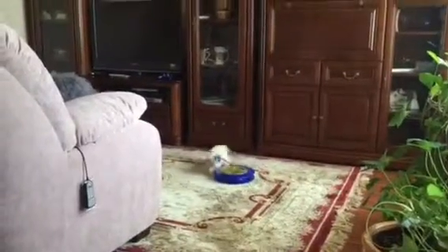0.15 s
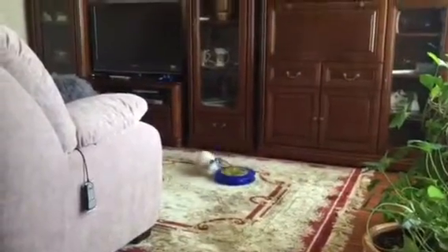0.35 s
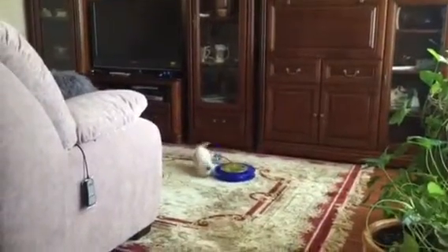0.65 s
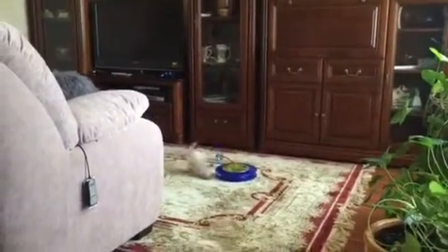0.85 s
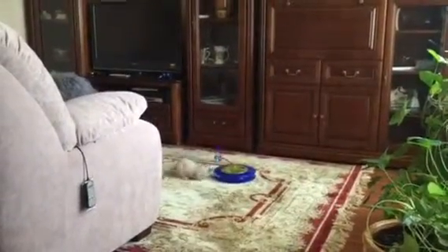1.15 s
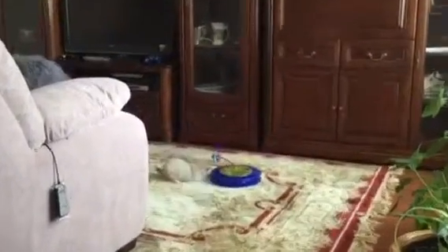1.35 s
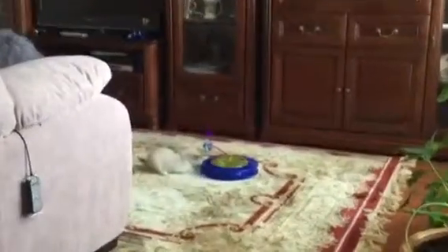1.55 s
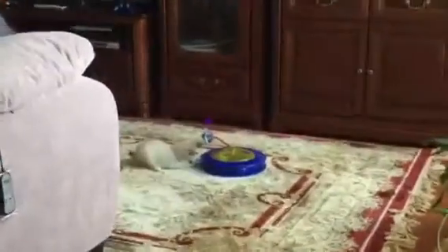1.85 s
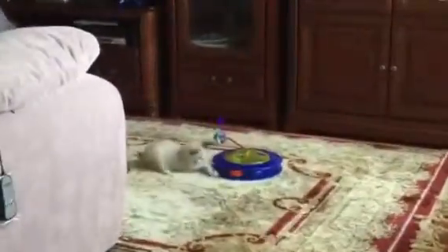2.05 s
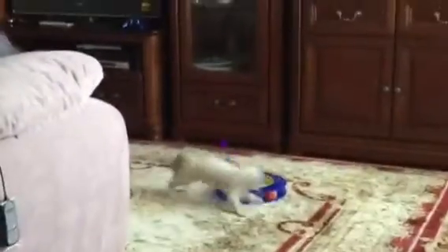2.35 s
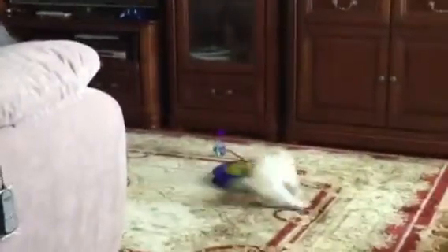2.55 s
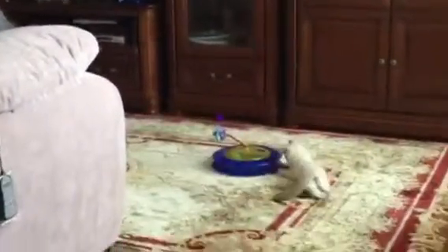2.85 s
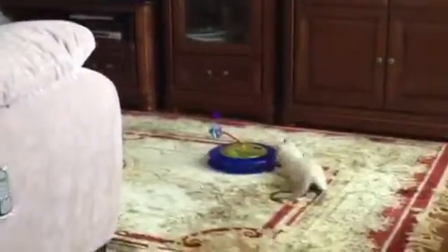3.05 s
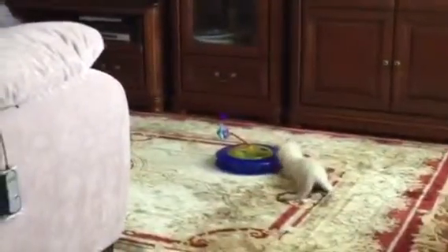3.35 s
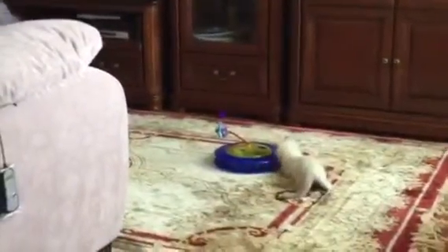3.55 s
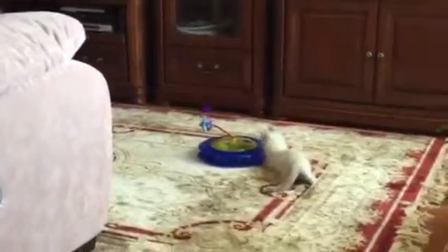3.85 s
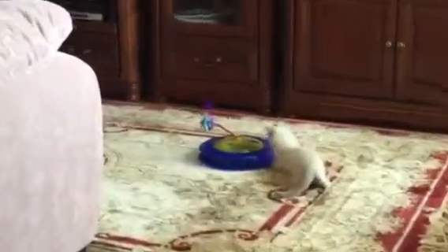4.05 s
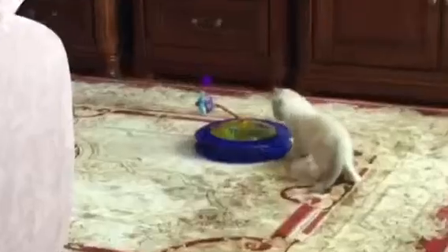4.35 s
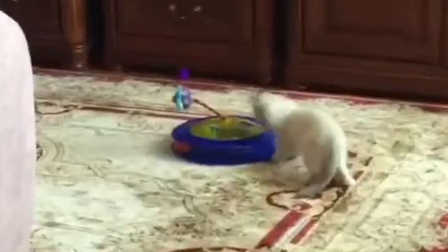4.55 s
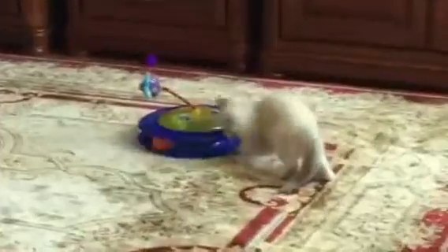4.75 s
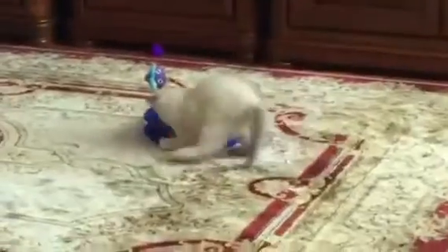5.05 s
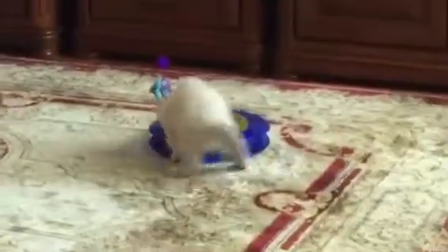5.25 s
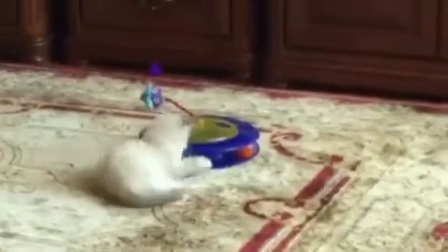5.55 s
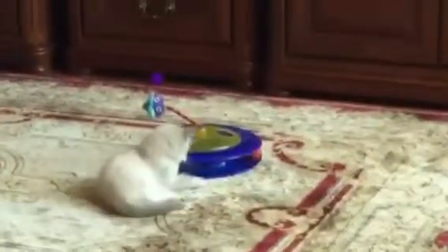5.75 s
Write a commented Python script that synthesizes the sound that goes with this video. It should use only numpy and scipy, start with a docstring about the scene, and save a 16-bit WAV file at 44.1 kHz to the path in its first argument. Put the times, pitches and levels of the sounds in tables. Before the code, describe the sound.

A kitten plays with a round plastic ball track on a living room rug. A sharp, hollow clack comes right at the start, followed by scattered lighter knocks and small ticks. The ball rattles faintly as it rolls in short runs, and paws thump softly on the floor. Quick clusters of clacks come midway and near the end. A small microphone a few metres away picks up a brief room ring, faint air noise and hum.

```python
"""A furnished living room, one small microphone a few metres from a kitten playing on the rug.
Its toy is a round plastic ball track: the ball knocks against the hollow walls and rumbles as it rolls,
loose plastic parts tick, and paws thump the floor. The room rings briefly after each knock and tick,
over faint air noise and a hum in the house."""
import sys
import numpy as np
from scipy import signal
from scipy.fft import rfft, irfft, next_fast_len
from scipy.io import wavfile

SR = 44100
rng = np.random.default_rng(int(sys.argv[2]) if len(sys.argv) > 2 else 0)


def persist_wave(psi):
    """Save psi, clipped to +-1, as 16-bit WAV."""
    counts = np.round(np.clip(psi, -1, 1) * 32767).astype(np.int16)
    wavfile.write(sys.argv[1], SR, np.atleast_2d(counts).T)


N = 259749
T = np.arange(int(.45 * SR)) / SR  # time axis of one blow, s

# modes of the hollow track: pitch_hz, relative_db, t60_s
TRACK_MODES = [(691, 9.5, 0.052), (827, 1, .22), (874, 4.5, 0.3), (939, 3.5, 0.26), (966, 1.5, 0.35),
               (1017, -6.5, 0.43), (1048, 2.5, 0.36), (1287, -8.5, 0.38), (1398, -3, 0.26),
               (1509, -1.5, .32), (1610, -10.5, 0.24), (1900, -24.5, 0.17), (2040, -29.5, 0.11),
               (2060, -1, 0.089), (2440, -14, 0.45), (2580, -13.5, 0.12), (2900, -24.5, 0.25),
               (3126, -7, 0.094), (2995, -12, 0.12), (3510, -9.5, 0.25), (3700, -16, 0.27),
               (3950, -26.5, 0.15), (4360, -14.5, 0.22), (6140, -35, 0.68)]
# spectrum of the crack of a contact with the track: frequency_hz, relative_db
CRACK_SPECTRUM = [(150, -25.5), (360, 0.5), (500, -12.5), (800, 6.5), (1600, -0.5), (2250, -3),
                  (3150, -0.5), (4800, -10.5), (6200, -6), (7500, -13.5), (9500, -6.5), (11000, -37.5)]


def undb(db):
    """Decibels to gain."""
    return 10 ** (np.asarray(db) / 20)


def unit(x):
    """Scale to unit energy."""
    return x / np.sqrt(np.sum(x ** 2))


def fade(t60):
    """Exponential decay, 60 dB down after t60 seconds."""
    return np.exp(-np.log(1000) * T / t60)


def colour(x, points):
    """Minimum-phase filter through the points (frequency_hz, gain_db)."""
    size = 2 * next_fast_len(len(x))
    hz, db = np.transpose(points)
    log_hz = np.log(np.fft.rfftfreq(size, 1 / SR) + 1)
    cepstrum = irfft(np.log(undb(np.interp(log_hz, np.log(hz), db))))
    cepstrum[1:size // 2] *= 2
    cepstrum[size // 2 + 1:] = 0
    return irfft(rfft(x, size) * np.exp(rfft(cepstrum)))[:len(x)]


def butter(x, hz, kind, order=2):
    """Plain low-, high- or band-pass."""
    return signal.sosfilt(signal.butter(order, np.minimum(hz, SR / 2 - 1), kind, fs=SR, output="sos"), x)


def place(out, start_s, level_db, sound):
    """Mix in a blow; level_db is the RMS level of its first 25 ms."""
    start = int(start_s * SR)
    gain = undb(level_db) / np.sqrt(np.mean(sound[:SR // 40] ** 2))
    out[start:start + len(T)] += gain * sound[:N - start]


def room_tone(air_db=-64, waver_hz=1.604):
    """Faint air noise and a slightly wavering hum."""
    # air in the still room: frequency_hz, relative_db
    air_spectrum = [(25, -36), (45, -14.5), (70, -7.5), (110, -1), (180, -5), (230, -5), (380, -11),
                    (600, -15.5), (1000, -20), (2000, -25), (4000, -28.5), (10500, -35.5)]
    # hum in the house: pitch_hz, level_db
    hum_tones = [(49.5, -74), (97.5, -72.5), (123.5, -71.5), (215.5, -73.5)]
    air = colour(rng.standard_normal(N), air_spectrum)
    out = air / np.std(air) * undb(air_db)
    for pitch_hz, level_db in hum_tones:
        drift = butter(rng.standard_normal(N), 5.1, "lowpass")
        wavering_hz = pitch_hz + waver_hz * drift / np.std(drift)
        out += np.sqrt(2) * undb(level_db) * np.sin(2 * np.pi * np.cumsum(wavering_hz) / SR)
    return out


def in_room(sound, wet_db, build_s=0.0029, cabinet_s=.0083, cabinet_db=-7):
    """Direct sound, a reflection off the cabinets and a fresh diffuse tail whose treble dies first."""
    # reverberation time of the room: frequency_hz, t60_s
    decay_times = [(150, 0.74), (500, 0.33), (1000, 0.28), (2000, 0.32), (4000, 0.28), (10000, 0.23)]
    centres_hz, t60s = np.transpose(decay_times)
    noise = rfft(rng.standard_normal(len(T)))
    log_hz = np.log(np.fft.rfftfreq(len(T), 1 / SR) + 1)
    bands = (np.interp(log_hz, np.log(centres_hz), row) for row in np.eye(len(centres_hz)))
    tail = sum(irfft(noise * band, len(T)) * fade(t60) for band, t60 in zip(bands, t60s))
    response = undb(wet_db) * unit(tail * (1 - np.exp(-T / build_s)))
    response[0] += 1
    response[int(cabinet_s * SR)] += undb(cabinet_db)
    return signal.fftconvolve(sound, unit(response))[:len(T)]


def ring(modes, detune):
    """Decaying modes; the place of the blow changes their phase and, a little, their strength and pitch."""
    out = 0
    for hz, db, t60 in modes:
        size, shift = rng.standard_normal(2)
        phase = 2 * np.pi * (hz * (1 + detune * shift) * T + rng.random())
        out = out + undb(db + 2 * size) * fade(t60) * np.sin(phase)
    return unit(out * (1 - fade(0.01)))


def click(t60, grit_db):
    """A sharp impulse followed by grit: the dense, quickly dying modes of thin plastic."""
    burst = undb(grit_db) * unit(rng.standard_normal(len(T)) * fade(t60))
    burst[0] += 1
    return burst


def contact(spectrum, t60, grit_db):
    """A click coloured by the plastic part that is struck."""
    return unit(colour(click(t60, grit_db), spectrum))


def rim_clack(t60, band_hz=(1300, 1900)):
    """The stiff rim clacks with a cluster of close, short modes."""
    return unit(butter(click(t60, grit_db=-2), band_hz, "bandpass", order=3))


def paw_thumps(push_s=0.003):
    """Paws push softly on the rug and the floor answers."""
    # soft landings of the kitten: start_s, level_db
    landings = [(0.794, -51), (0.829, -48), (2.844, -43), (2.905, -46), (5.594, -46), (5.689, -52)]
    # modes of the floor under the rug: pitch_hz, relative_db, t60_s
    floor_modes = [(134.6, -6.5, 0.45), (187, 14.5, 0.031), (204.6, 9.5, 0.24), (279, 10.5, 0.13)]
    out = np.zeros(N)
    for start_s, level_db in landings:
        place(out, start_s, level_db, ring(floor_modes, detune=0.019) * (1 - np.exp(-T / push_s)))
    return out


def plastic_ticks():
    """Small stiff parts ring in the treble and pass some of the blow on to the track."""
    # light ticks of loose plastic: start_s, level_db, low_cut_hz, track_share_db
    ticks = [(0.2580, -46, 5770, -13), (1.4707, -57, 5440, -16), (2.043, -67.5, 6950, -22),
             (2.138, -66, 5560, -19), (2.170, -63, 6100, -15), (2.8135, -62.5, 5800, -22),
             (3.34, -58.5, 6500, 0), (3.386, -42, 1470, -15), (4.646, -69.5, 6000, -22)]
    # spectrum of a tick: frequency_hz, relative_db
    tick_spectrum = [(1000, 7), (3000, 4.5), (4500, 0.5), (6500, 3.5), (7800, -2), (9300, 3.5),
                     (11000, -18.5)]
    out = np.zeros(N)
    for start_s, level_db, low_cut_hz, track_share_db in ticks:
        tick = contact(tick_spectrum, t60=0.018, grit_db=-1)
        small_part = in_room(unit(butter(tick, low_cut_hz, "highpass", order=6)), wet_db=1.5)
        track = undb(track_share_db) * ring(TRACK_MODES, detune=.002)
        place(out, start_s, level_db, small_part + track)
    return out


def roll_gain(push_s=.02, friction_db_per_s=14, stop_db_per_s=202.5, wobble_hz=21, wobble_db=1.5):
    """Each run swells with the push, sinks as friction slows the ball and dies away when it stops."""
    # runs of the ball round the track: start_s, length_s, start_level_db
    runs = [(0, 0.2, -65.5), (2.118, 0.099, -55), (2.356, .3, -66), (2.829, 0.079, -42.5),
            (3.517, 0.31, -68), (3.92, 0.38, -74.5), (4.462, 1, -69.5), (5.012, 0.061, -60.5),
            (5.496, .23, -58), (5.855, .05, -63.5)]
    out = np.zeros(N)
    for start_s, length_s, start_level_db in runs:
        age_s = np.maximum(np.arange(N) / SR - start_s, 0)
        loss_db = friction_db_per_s * age_s + stop_db_per_s * np.maximum(age_s - length_s, 0)
        out += np.minimum(age_s / push_s, 1) * undb(start_level_db - loss_db)
    # the ball wobbles in its groove, so the rattle comes in spurts
    wobble = butter(rng.standard_normal(N), wobble_hz, "lowpass")
    return out * undb(wobble_db * wobble / np.std(wobble))


def rolling_ball(spread_db=3, wall_band_hz=(900, 1350), rim_db=-4, track_db=-8, crack_db=-14):
    """The ball trips over ridges at uneven steps; the small bumps rattle in the walls and the rim."""
    gaps_s = rng.uniform(.003, .035, 600)
    sizes = rng.choice([-1, 1], len(gaps_s)) * undb(spread_db * rng.standard_normal(len(gaps_s)))
    bumps = np.bincount((np.cumsum(gaps_s) * SR).astype(int), sizes, minlength=N)[:N]
    walls = unit(butter(signal.unit_impulse(len(T)), wall_band_hz, "bandpass"))
    rim = undb(rim_db) * rim_clack(t60=0.043)
    crack = undb(crack_db) * contact(CRACK_SPECTRUM, t60=0.049, grit_db=3)
    one_bump = in_room(walls + rim + crack, wet_db=4) + undb(track_db) * ring(TRACK_MODES, detune=0.0016)
    rattle = signal.fftconvolve(bumps, one_bump)[:N]
    return rattle / np.std(rattle) * roll_gain()


def track_knocks(wall_t60=0.014, rise_s=0.0016, track_db=-1.5, soft_hz=2200,
                 medium_wall_hz=1020, medium_blow_db=-48):
    """Each blow dents a wall for a few cycles, clacks the rim, cracks, and sets track and base ringing."""
    # ball and paws against the track: start_s, level_db, wall_pitch_hz, crack_db (higher is harder)
    blows = [(0.041, -57, 1100, -18), (0.096, -59.5, 1110, -6), (0.199, -56.5, 1160, -7),
             (0.279, -23, 872, 0.5), (0.671, -61, 686, -28), (0.736, -50.5, 740, -13),
             (0.81, -54.5, 746, -8), (1.5143, -31, 910, -3.5), (1.9119, -40.5, 896, -5),
             (2.139, -46.5, 980, -7.5), (2.154, -46, 1270, -8.5), (2.174, -42.5, 1067, -15),
             (2.226, -50.5, 966, -21), (2.314, -59.5, 1060, -11), (2.358, -52, 1010, -11),
             (2.497, -61, 1510, -8), (2.629, -53, 1146, -13.5), (2.816, -54, 1340, -11),
             (2.8400, -31.5, 632, -3.5), (2.852, -39, 1320, 1), (2.926, -42.5, 1055, -2),
             (3.435, -46.5, 480, -4.5), (3.609, -55.5, 1070, -17), (3.6595, -48, 1150, -17),
             (4.018, -62, 1060, -22), (4.089, -55, 1140, -37), (4.151, -60, 1100, -26),
             (4.6478, -51, 1140, -17), (4.683, -65, 1240, -21), (5.019, -51.5, 990, -23),
             (5.1013, -42.5, 977, -22), (5.32, -54, 924, -14.5), (5.4636, -35.5, 928, -8),
             (5.485, -38, 624, -5.5), (5.508, -38, 520, -12.5), (5.544, -49.5, 1010, 15),
             (5.585, -43.5, 1060, 3), (5.599, -45, 670, -2), (5.623, -42.5, 1100, -11.5),
             (5.700, -57.5, 940, 1.5)]
    # modes of the toy's base: pitch_hz, relative_db, t60_s
    base_modes = [(210.3, -13.5, 0.47), (290.3, -2.5, 0.25), (365.4, -2, 0.22), (431.7, -8.5, 0.2),
                  (547, 1, 0.2), (609, 5, 0.064)]
    out = np.zeros(N)
    for start_s, level_db, wall_pitch_hz, crack_db in blows:
        wall = np.sin(2 * np.pi * wall_pitch_hz * T) * fade(wall_t60) * (1 - np.exp(-T / rise_s))
        # so small a wall radiates little below its own pitch
        wall = unit(butter(wall, 0.54 * wall_pitch_hz, "highpass", order=3))
        # the rim clacks more under a hard contact and near a stiff, high-pitched wall
        rim_db = -5 + 0.38 * crack_db + 5 * np.log2(wall_pitch_hz / medium_wall_hz)
        rim = undb(rim_db) * rim_clack(t60=0.015)
        crack = undb(crack_db) * contact(CRACK_SPECTRUM, t60=0.029, grit_db=9.0)
        # a soft contact misses the high modes
        bright = ring(TRACK_MODES, detune=0.00083)
        dull = butter(bright, soft_hz, "lowpass", order=1)
        hardness = min(undb(crack_db) * 2, 1)
        track = undb(track_db) * (dull + hardness * (bright - dull))
        impact = in_room(wall + rim + crack, wet_db=1.0)
        # the base's boom has its largest share under light, slow pushes
        boom_db = -5 - 0.2 * (level_db - medium_blow_db)
        boom = undb(boom_db) * ring(base_modes, detune=0.01)
        place(out, start_s, level_db, impact + track + boom)
    return out


def scene():
    """The toy, the kitten and the room in one channel."""
    return (track_knocks() + plastic_ticks() + paw_thumps() + rolling_ball() + room_tone())[None]


def record(dry, low_cut_hz=30, high_cut_hz=10600):
    """The small microphone loses the deepest bass; the recorder cuts the top steeply."""
    thin = butter(dry, low_cut_hz, "highpass", order=3)
    return signal.sosfilt(signal.ellip(8, .2, 70, high_cut_hz, fs=SR, output="sos"), thin)


dry = scene()
out = record(dry)
persist_wave(out)
```